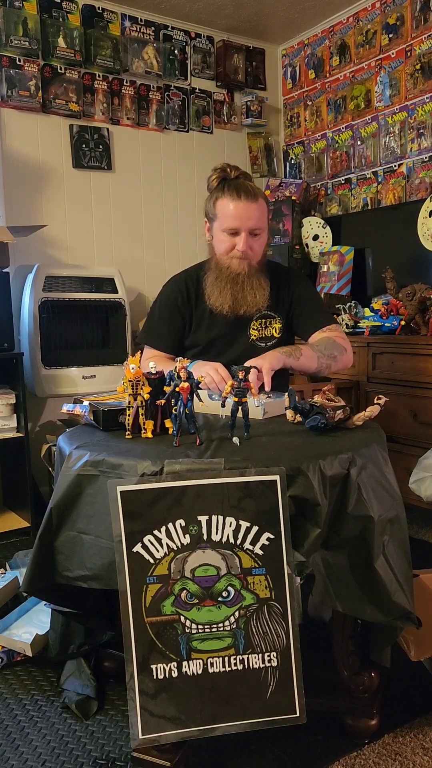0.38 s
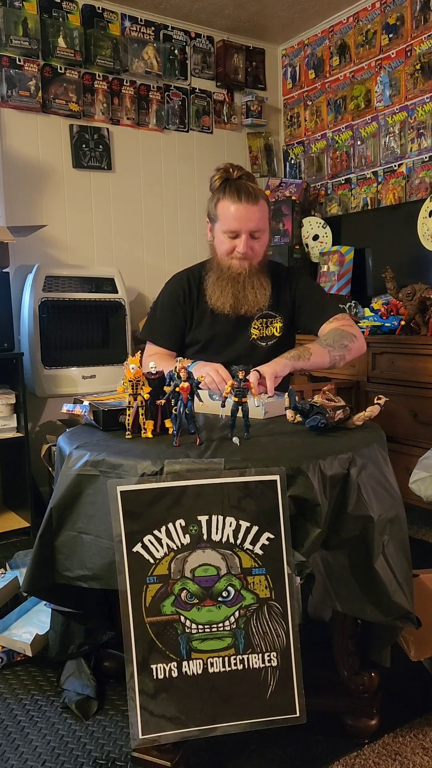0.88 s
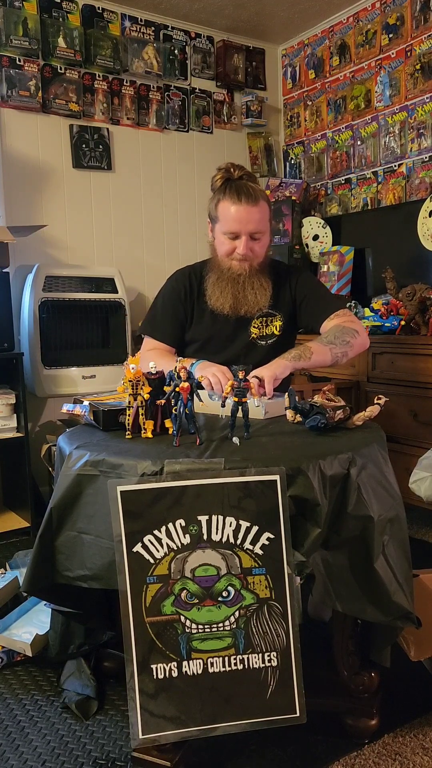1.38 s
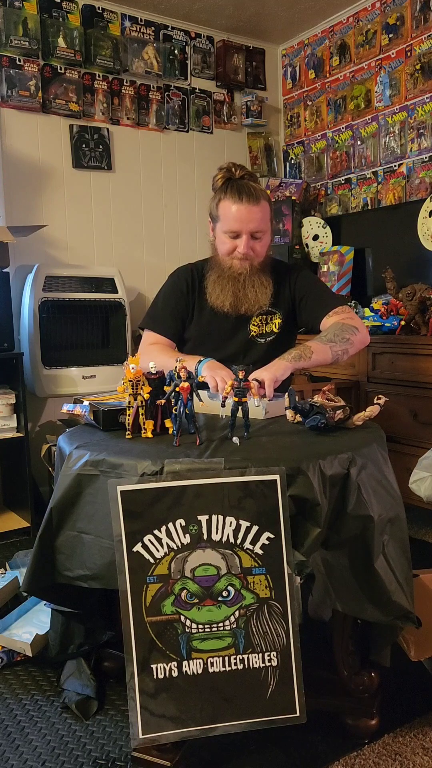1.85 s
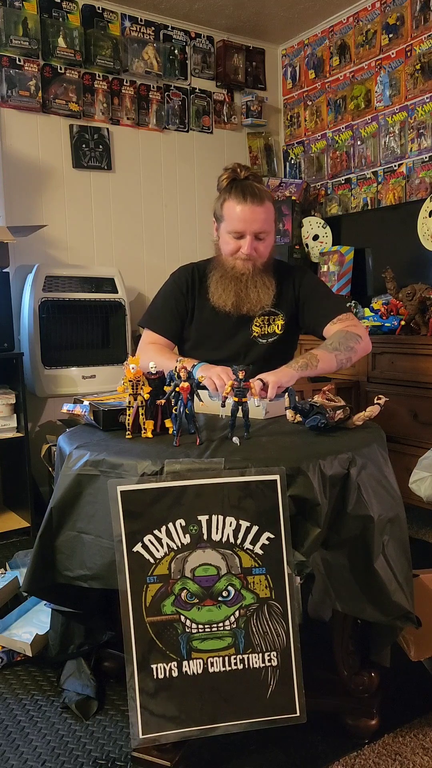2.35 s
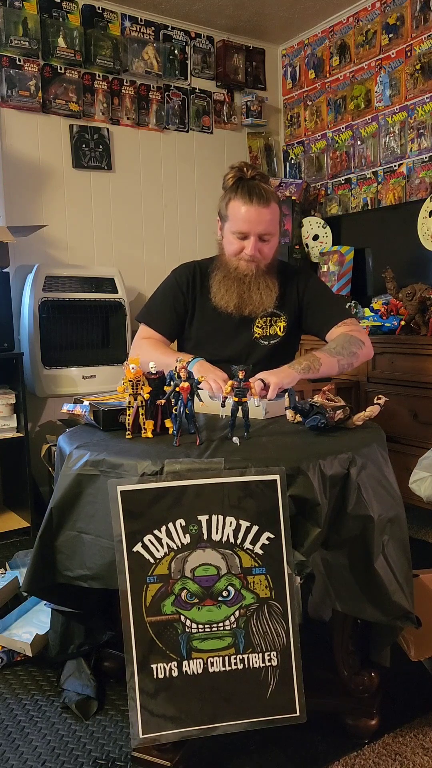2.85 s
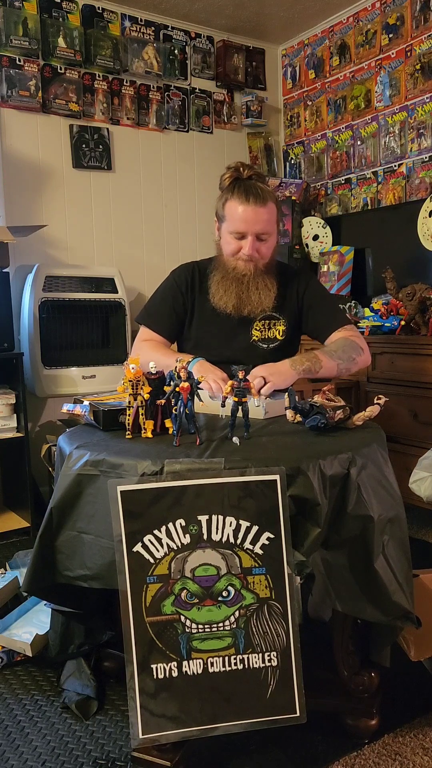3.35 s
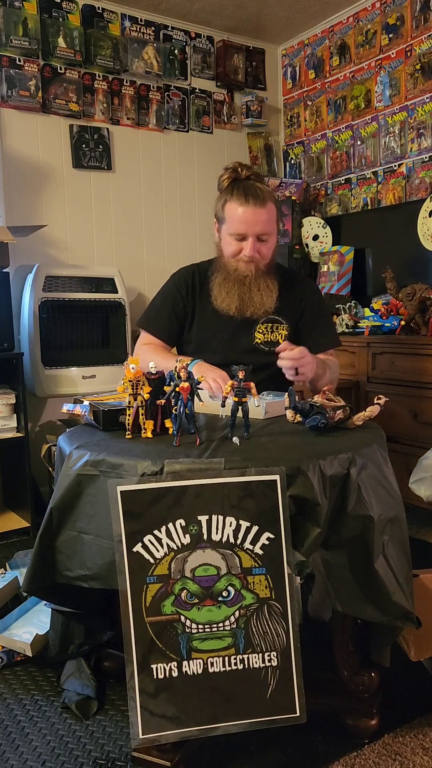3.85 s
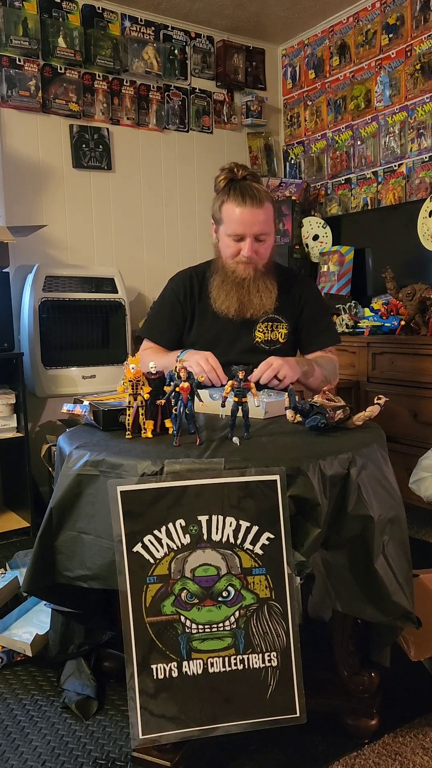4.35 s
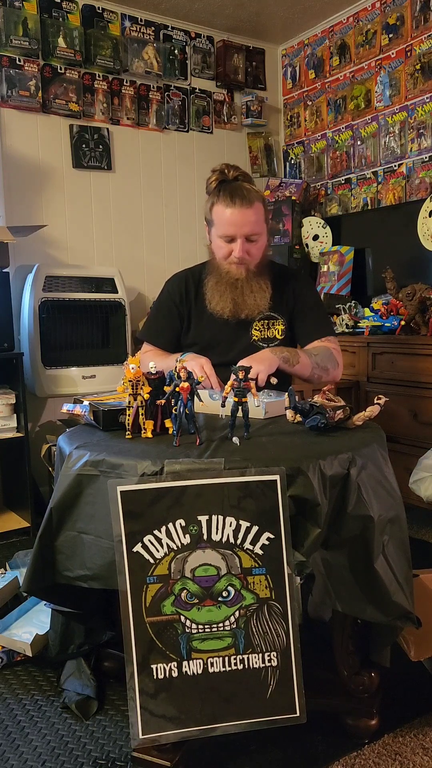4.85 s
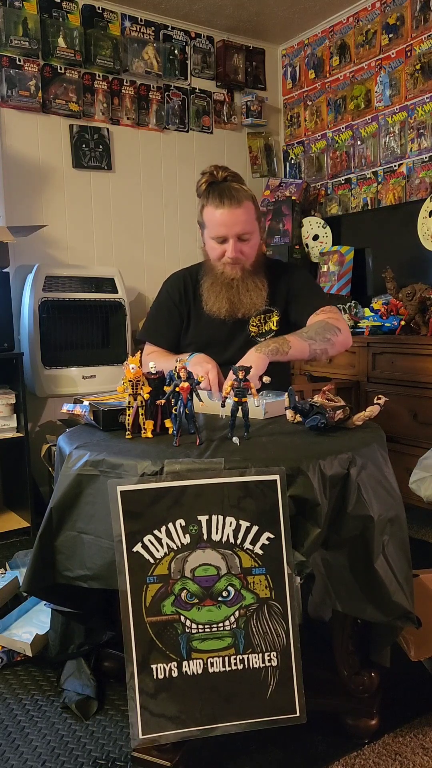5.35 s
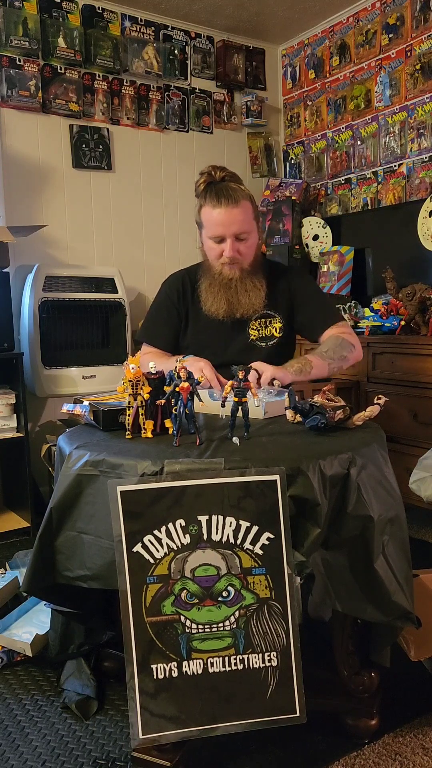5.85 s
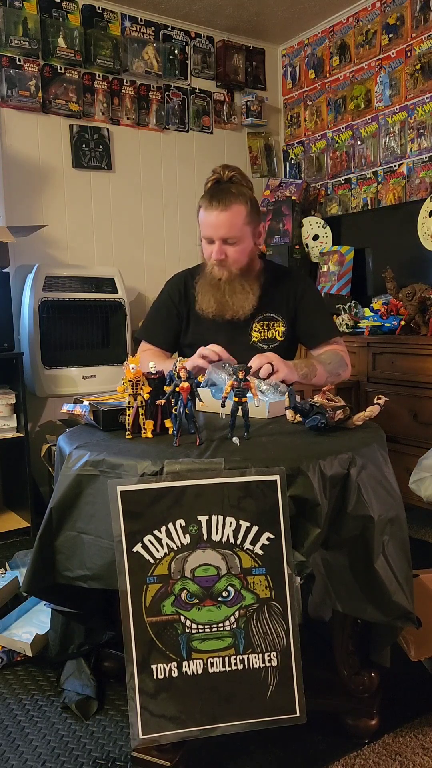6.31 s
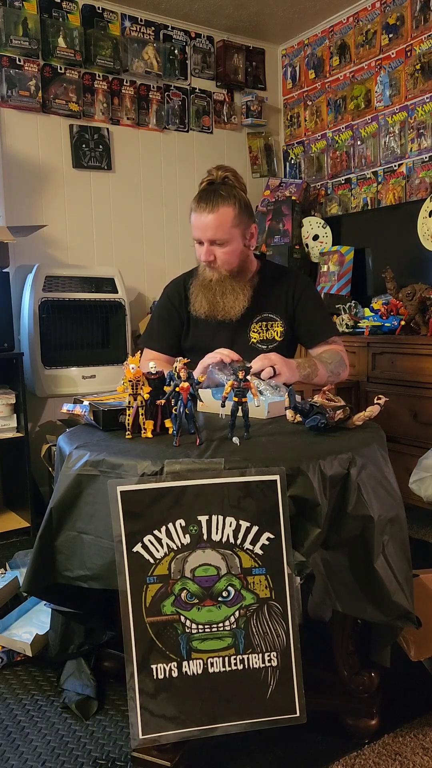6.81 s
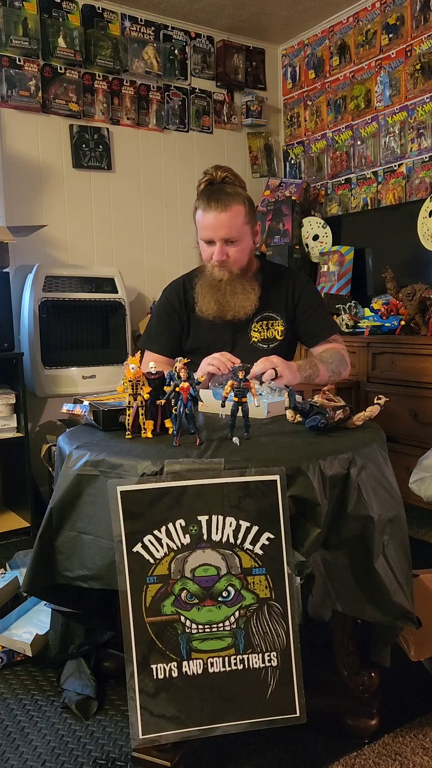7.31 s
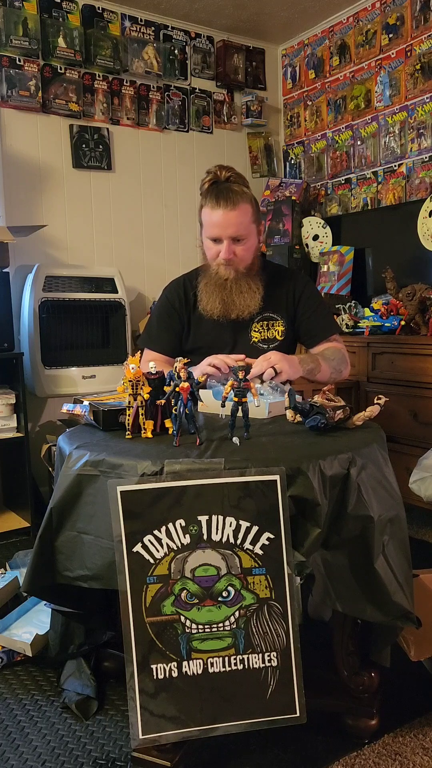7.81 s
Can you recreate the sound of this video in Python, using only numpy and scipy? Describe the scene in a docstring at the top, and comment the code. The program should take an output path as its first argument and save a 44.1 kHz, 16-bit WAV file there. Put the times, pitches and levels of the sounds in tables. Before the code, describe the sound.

A small furnished room with faint air and a low, slightly wavering appliance hum. Hands handle stiff plastic and a cardboard box on a table a few steps from a stereo phone. From 0 to 1 s there are only light ticks and weak rustle. From about 1.2 to 3 s it becomes busy: sharp crease snaps, short pitched plastic pops, fine crackle and hollow box knocks, strong near 1.9 and 2.8 s. It thins around 3.0-3.5 s; firm box and table thumps come at 3.6-3.7 s, then a dense, bright cluster at 4.0-4.25 s. A near-pause follows, broken by one hard snap at 4.8 s. Moderate crackling and bumps run from 5.2 to 6.0 s, then softer, sparse taps until 7.2 s. A final flurry peaks near 7.45 s and dwindles into scattered clicks past 8 s. Reflections are short; the left is crisper, the right duller.

```python
"""Plastic creases snap, fingers knock a cardboard box, and a finer crackle follows the handling over a low hum.
Indoors: hands work a stiff tray and the box on a table, a few steps from a phone with two microphone ports.
Snaps are smeared clicks with a pitched ring; crackle is clumps of tiny clicks; box and table are resonances.
A few echoes and a small furnished room answer; hum is unsteady sines and room air is coloured noise.
The two ports differ in arrival time and brightness."""
import sys
import numpy as np
from scipy import signal
from scipy.fft import rfft, irfft, next_fast_len
from scipy.io import wavfile
from scipy.ndimage import uniform_filter1d, map_coordinates

SR = 44100
rng = np.random.default_rng(int(sys.argv[2]) if len(sys.argv) > 2 else 0)


def magnitude_from_level(level_db):
    """Linear magnitude for a level in decibels (20 dB per decade)."""
    exponent = np.asarray(level_db, float) / 20
    return 10 ** exponent


def dump(signal):
    """Clip the signal to [-1, 1] and save it as 16-bit WAV at the path in sys.argv[1]."""
    limited = np.clip(np.atleast_2d(signal).T, -1, 1)
    pcm = np.round(limited * 32767).astype(np.int16)
    wavfile.write(sys.argv[1], SR, pcm)


N = 361179  # samples


def unit(x):
    """Scaled to rms 1."""
    return x / np.sqrt(np.mean(x ** 2) + 1e-20)


def along(points, hz):
    """(Hz, value) points read on a log frequency axis."""
    f, v = np.transpose(points)
    return np.interp(np.log(hz + 1), np.log(f + 1), v)


def wobble(rate):
    """A smooth random curve with rate knots a second."""
    knots = rng.standard_normal(int(N * rate / SR) + 4)
    return map_coordinates(knots, [np.arange(N) * rate / SR])


def filtered(x, response):
    """The sound x times a complex response of frequency."""
    m = 2 * next_fast_len(x.shape[-1] // 2 + 8192)  # padded, so tails do not wrap round
    spectrum = rfft(x, m) * response(np.fft.rfftfreq(m, 1 / SR))
    return irfft(spectrum, m)[..., :x.shape[-1]]


def causal(points):
    """A minimum-phase colour: its response starts only after the blow."""
    def response(hz):
        cepstrum = irfft(np.log(magnitude_from_level(along(points, hz))))
        cepstrum[1:len(hz) - 1] *= 2  # fold the half before the blow onto the half after
        cepstrum[len(hz):] = 0
        return np.exp(rfft(cepstrum))
    return response


def resonant(modes):
    """A body's response: band-pass resonances summed with alternating sign."""
    def response(hz):
        total = 0
        for k, (centre, width, db) in enumerate(modes):
            damping = 1j * hz * width
            total = total + (-1) ** k * magnitude_from_level(db) * damping / (centre ** 2 - hz ** 2 + damping)
        return total
    return response


def placed(times, shapes):
    """Rows of samples summed at their start times in seconds."""
    at = np.round(times * SR).astype(int)[:, None] + np.arange(shapes.shape[1])
    return np.bincount(at.ravel(), shapes.ravel(), N + SR)[:N]


# room sound at the two ports: pitch_hz, left_right_likeness (1 = identical)
PORT_LIKENESS = [(60, 0.85), (200, 0.99), (500, 0.61), (1200, 0.04), (4000, 0.034)]


def pair(a, b):
    """Two unrelated signals mixed to the left-right likeness of a diffuse field."""
    def mid_side(hz):
        turn = np.arccos(np.clip(along(PORT_LIKENESS, hz), 0, 1)) / 2
        return np.array([np.cos(turn), np.sin(turn)])
    mid, side = filtered(np.array([a, b]), mid_side)
    return np.array([mid + side, mid - side])


# low tones of the appliance and the mains: pitch_hz, level_db (rms before the wobble)
HUM_TONES = [(36.5, -55), (59.5, -80), (119.5, -59.5)]


def hum():
    """A motor and mains hum: sines whose level and phase wander slightly."""
    t = np.arange(N) / SR
    total = np.zeros(N)
    for hz, db in HUM_TONES:
        level = np.sqrt(2) * magnitude_from_level(db + 1.1 * wobble(4.4))
        cycles = hz * t + 0.11 * wobble(1.71)
        total += level * np.sin(2 * np.pi * cycles)
    return total


# colour of the room tone: pitch_hz, level_db (relative, per Hz)
AIR_COLOUR = [(24, -24), (32, -5.5), (55, -6), (85, -5.5), (140, -17), (180, -19.5), (640, -15.5),
              (870, -23), (1900, -24), (2700, -34.5), (7400, -30.5), (8800, -75), (12200, -31.5),
              (15700, -45), (16300, -61)]
AIR_DB = -54  # rms


def room_air():
    """Faint air in the room: diffuse coloured noise."""
    noise = rng.standard_normal((2, N))
    air = unit(filtered(noise, lambda hz: magnitude_from_level(along(AIR_COLOUR, hz))))
    return magnitude_from_level(AIR_DB) * pair(*air)


def grains(count, spread_db, clump_db):
    """Tiny clicks of either sign, a few much larger than the rest, in clumps."""
    when, size, sign = rng.random((count, 3)).T
    heights = np.sign(sign - 0.5) * magnitude_from_level(-spread_db * np.log(size))
    return placed(when * N / SR, heights[:, None]) * magnitude_from_level(clump_db * wobble(25))


# resonances of the cardboard box: pitch_hz, width_hz, level_db
BOX_MODES = [(359, 92, -4.5), (467.6, 33.4, 2), (634.5, 69, 4), (755, 49, 3), (890, 264, -5.5)]
# colour of a plastic crack: pitch_hz, level_db
CRACK_COLOUR = [(300, -21.5), (800, -3.5), (1400, 6.5), (2500, 1), (4000, -3), (8000, -22.5)]
# colour of the finer plastic fizz: pitch_hz, level_db
FIZZ_COLOUR = [(1500, -19.5), (3000, 4.5), (5000, 4), (8000, 6.5), (12000, 5.5), (16000, -8)]
# the tray being bent: start_s, hold_s, plastic_db, fingers_on_box_db (relative)
TRAY_BENDS = [(0.0, 0.037, -54, -61), (0.328, .04, -63, -60), (0.422, 0.17, -59, -66),
              (0.982, 0.16, -62, -77), (1.193, .15, -43, -49), (1.5, 0.32, -42, -46),
              (1.939, 0.065, -39, -43), (2.05, 0.49, -46, -49.5), (2.681, 0.12, -60, -47),
              (2.873, 0.19, -46, -48), (3.046, 0.14, -54, -51), (3.286, .04, -57, -60),
              (3.547, 0.055, -47, -44), (4.13, 0.038, -35.5, -32), (4.217, 0.077, -38, -50),
              (5.167, 0.14, -45, -46.5), (5.439, 0.13, -56.5, -44), (5.655, 0.29, -50, -46.5),
              (6.005, 0.11, -52, -54), (6.453, 0.044, -54, -51), (6.556, 0.12, -55, -50),
              (6.853, 0.41, -72, -52.5), (7.334, 0.089, -39, -40.5), (7.676, .03, -44, -45.5),
              (7.91, 0.37, -64, -48)]
RISE_DB_PER_S, FALL_DB_PER_S = 200, 194  # pressure building up and letting go


def crackle():
    """Small creases give way while the plastic is bent; fingers rub and tap the resonant box."""
    start, hold, plastic_db, fingers_db = np.transpose(TRAY_BENDS)[:, :, None]
    t = np.arange(N) / SR
    before = np.maximum(start - t, 0)
    after = np.maximum(t - start - hold, 0)
    pressure = magnitude_from_level(-RISE_DB_PER_S * before - FALL_DB_PER_S * after)
    plastic = grains(count=2000, spread_db=5.0, clump_db=0.5)
    plastic = filtered(plastic, causal(FIZZ_COLOUR)) + magnitude_from_level(2.0) * filtered(plastic, causal(CRACK_COLOUR))
    fingers = grains(count=1600, spread_db=5.5, clump_db=3.0)
    fingers = filtered(fingers, resonant(BOX_MODES)) + magnitude_from_level(-16.0) * filtered(fingers, causal(CRACK_COLOUR))
    # where bends overlap, the strongest sets the level
    plastic_level = (magnitude_from_level(plastic_db) * pressure).max(axis=0)
    fingers_level = (magnitude_from_level(fingers_db) * pressure).max(axis=0)
    return plastic_level * unit(plastic) + fingers_level * unit(fingers)


# direct path, partly hidden by hands and objects: pitch_hz, level_db
DIRECT_SHADE = [(400, 0.5), (1500, 1.5), (4000, -1), (10000, -4)]
# nearest hard surfaces: left_port_s, level_at_1khz_db, level_at_8khz_db, right_port_later_s (negative: earlier)
NEAR_ECHOES = [(.0057, -3.5, -4.5, -0.0036), (.011, -17, -32, -0.016), (0.0164, -13, -25, .0001),
               (.024, -16, -10, -0.0049)]
LEAD_S = 16 / 44100  # the left port is nearer


def direct_and_echoes(x):
    """Direct sound meets the left port first; near surfaces add coloured copies, mostly delayed.

    One copy reaches the right port ahead of the direct sound."""
    def late(hz, left_s, right_s):
        return np.exp(-2j * np.pi * hz * [[left_s], [right_s]])

    def early(hz):
        total = causal(DIRECT_SHADE)(hz) * late(hz, 0, LEAD_S)
        for left_s, low_db, high_db, lag in NEAR_ECHOES:
            colour = magnitude_from_level(along([(1000, low_db), (8000, high_db)], hz))
            total = total + colour * late(hz, left_s, left_s + lag)
        return total
    return filtered(x, early)


# decay of the furnished room: pitch_hz, t60_s
ROOM_DECAY = [(200, 0.28), (600, 0.22), (1500, 0.29), (4000, 0.36), (12000, 0.25)]


def room(x):
    """The hands move, so every fifth of a second meets a new decaying pattern of reflections."""
    step = SR // 5
    out = np.zeros((2, N + 2 * SR))
    for start in range(0, N, step):
        hz, t, z = signal.stft(rng.standard_normal((2, SR // 3)), SR, nperseg=256)
        decay = magnitude_from_level(-60 * t / along(ROOM_DECAY, hz)[:, None])
        tail = signal.istft(z * decay, SR, nperseg=256)[1]
        # table clutter scatters first, walls later
        tail *= np.clip(0.55 + np.arange(tail.shape[1]) / SR / 0.021, 0, 1)
        tail /= np.linalg.norm(tail[0])
        answer = signal.fftconvolve(x[None, start:start + step], tail, axes=1)
        out[:, start:start + answer.shape[1]] += answer
    return pair(*out[:, :N])


def clicks(count, smear_s):
    """Even-coloured clicks whose frequencies leave the bending sheet at slightly different moments."""
    hz = np.fft.rfftfreq(512, 1 / SR)
    delay = smear_s * uniform_filter1d(rng.standard_normal((count, len(hz))), size=12, axis=1) ** 2
    return irfft(np.exp(-2j * np.pi * hz[1] * np.cumsum(delay, axis=1)))  # phase sums the delays


# creases snapping: start_s, crack_db (relative), box_knock_db and fizz_db (over the crack), panel_pitch_hz
CREASE_SNAPS = [(0.155, -38.5, -4.5, -14, 902), (0.2276, -35, -18, -18, 1320), (0.279, -43, -5, -1, 1620),
                (0.3295, -30.5, -37, -40, 2230), (0.4052, -32.5, -9.5, 0.5, 1330),
                (0.5107, -34, -24, -7, 1430), (0.5232, -27.5, -2.5, -14, 940),
                (0.5534, -27, -24, -20, 1050), (0.6726, -44, -17, 0, 3340), (0.702, -39, -9, -1.5, 1570),
                (0.85, -47.5, -8, 8, 3900), (1.0006, -29, -9.5, -8, 3390), (1.0713, -31, -4.5, -15, 940),
                (1.1183, -22.5, -27, -21, 3380), (1.164, -29.5, -8, -3, 950), (1.2139, -38, -27, 7, 3340),
                (1.261, -28, -19, -22, 3210), (1.2747, -19.5, -18, -10, 1940),
                (1.3439, -12.5, -15, -14, 885), (1.3597, -15, -15, -9, 1340), (1.4336, -29, -10, 0, 3800),
                (1.4473, -13.5, -11.5, -5.5, 1320), (1.5524, -19.5, -11, -31, 1680),
                (1.5645, -21, -12.5, -22, 1640), (1.586, -22, -38, -10, 1610),
                (1.6113, -14.5, -20.5, -9, 1290), (1.6384, -18.5, -12.5, -8.5, 2170),
                (1.7187, -19, -17, -23, 1010), (1.733, -18, -5.5, -7.5, 1580),
                (1.7635, -10.5, -15, -19, 1570), (1.7869, -16, -21, -6, 980),
                (1.8992, -12.5, -28, -13, 1300), (1.932, -5.5, -14.5, -9.5, 1430),
                (2.0406, -14.5, -16, -35, 1350), (2.1684, -38, -18, 0, 2070),
                (2.2812, -14.5, -18.5, -19.5, 1320), (2.3224, -24.5, -2, -2.5, 1590),
                (2.3537, -22, -10, -16, 1230), (2.4059, -15.5, -23, -10.5, 3100),
                (2.4554, -14.5, -17.5, -25, 1450), (2.603, -28.5, -21.5, -33, 1400),
                (2.6858, -18.5, -26, -13, 1440), (2.741, -23.5, -23, -5, 1220),
                (2.7575, -14.5, -21, -12.5, 3380), (2.7837, -17.5, -27, -7.5, 1580),
                (2.829, -4, -21, -20.5, 850), (2.9762, -18.5, -18.5, -9, 1530),
                (3.0912, -38.5, -17, 1, 1800), (3.1755, -33, -23, -48, 1190),
                (3.2656, -29.5, -33, -10, 2130), (3.2829, -22.5, -22, -5, 3560),
                (3.472, -43, -4.5, -2, 3800), (3.492, -37.5, -22, -8, 1250), (3.5251, -25.5, -17, -7, 3270),
                (3.567, -14.5, -20.5, -9.5, 2800), (3.6323, -10.5, -6.5, -14.5, 1050),
                (3.701, -14.5, -3, -11, 1340), (3.899, -35, -27.5, -45, 1340),
                (3.9642, -27.5, -27, -23, 2330), (3.9969, -23, -8, -12, 1590),
                (4.0135, -15.5, -16, -12.5, 3500), (4.031, -15.5, -10.5, -13, 1640),
                (4.054, -17.5, -26, -9, 1500), (4.1086, -17.5, -31, -8, 960), (4.131, -12, -12, -8.5, 2150),
                (4.1525, -10, -13.5, -10, 2120), (4.1913, -3, -35, -24, 2260),
                (4.2375, -4.5, -24.5, -15.5, 864), (4.416, -28.5, -14, -9.5, 1980),
                (4.7048, -47, -1, -1, 960), (4.7296, -41, -14, -26, 1470), (4.799, -39, -9, 3, 1060),
                (4.8056, -4, -12.5, -17.5, 960), (5.016, -30, -8.5, -23, 1270),
                (5.0809, -23, -12, -24, 1480), (5.134, -32.5, -17, -4.5, 1500),
                (5.1969, -18, -27, -33, 1920), (5.2568, -14.5, -14, -6.5, 1660),
                (5.421, -27, -27, -21, 1450), (5.4323, -21, -8, -14, 1440), (5.47, -16.5, -5, -15, 890),
                (5.4986, -15.5, -23, -13, 1470), (5.535, -16, -11, -5, 1180),
                (5.6546, -29.5, -7, -7.5, 2180), (5.7104, -32.5, -11, -7, 1620),
                (5.7883, -21, -9.5, -9.5, 880), (5.8082, -17.5, -27, -16, 1800),
                (5.9216, -21.5, -12, -12, 1680), (6.0193, -15.5, -26, -12.5, 1640),
                (6.032, -28.5, -3, -31, 1580), (6.1874, -38, -3, -2.5, 1560), (6.2027, -22.5, -6, -22, 960),
                (6.2923, -41.5, 4.5, -14, 1240), (6.414, -33, -12.5, -12, 1480),
                (6.4831, -33, 2, -7.5, 1650), (6.5887, -30, -22, -7, 958), (6.6574, -31, -3.5, -7.5, 1330),
                (6.7866, -26, -7.5, -26, 1060), (6.8633, -38, -3, -38, 1323),
                (6.9752, -21.5, -8.5, -13, 1760), (7.0559, -28.5, -9, -14, 2020),
                (7.159, -29.5, -3, -5.5, 1610), (7.2784, -18, -15.5, -11, 2130),
                (7.318, -17.5, -18, -12, 2660), (7.3385, -14, -14.5, -27, 1170),
                (7.3898, -23.5, -10.5, -11.5, 3140), (7.4128, -23.5, -18, -11, 900),
                (7.45, -25, -24, -9, 910), (7.4655, -7.5, -13, -12, 820), (7.609, -21, -37, -5, 880),
                (7.649, -26.5, -24.5, -3, 1550), (7.735, -26, -17, -16.5, 1040),
                (7.875, -33.5, -1, -34, 1730), (7.9078, -23.5, -23, -9, 2400),
                (7.936, -28, -22, -1.5, 1320), (8.0166, -20.5, -13, -6.5, 3550),
                (8.029, -24.5, -19, -7.5, 1170), (8.134, -14.5, -8.5, -21.5, 940)]
# the box bumping the table top: start_s, level_db (relative)
TABLE_BUMPS = [(0.523, -16), (1.072, -10), (1.36, -7), (1.447, 0.5), (1.611, -0.5), (1.734, 1),
               (1.763, 2.5), (1.932, 10), (2.041, -11), (3.632, 9), (3.701, 11), (4.032, -2), (4.807, -19),
               (5.017, -7), (5.257, 6), (5.433, 0), (5.47, 8), (5.499, -8), (5.71, -5.5), (5.809, 1),
               (6.204, -9), (6.483, -12), (6.657, -3.5), (7.163, -6), (7.39, -6), (8.134, -4)]
# resonances of the table top: pitch_hz, width_hz, level_db
TABLE_MODES = [(164, 73, -3), (281, 47.3, 4.5)]
RING_CYCLES = 11.7  # the panel's ring falls at 60 dB in this many cycles
THROUGH_BOX_DB = -19  # share of every box knock that reaches the table top


def snaps():
    """A buckling crease: a sharp click that rings the panel at its pitch, fizzes, and knocks box and table."""
    start, crack_db, knock_db, fizz_db, hz = np.transpose(CREASE_SNAPS)[:, :, None]
    bump_start, bump_db = np.transpose(TABLE_BUMPS)
    t = np.arange(512) / SR

    def blow(db, shape):
        return placed(start[:, 0], magnitude_from_level(db) * shape)
    ring = blow(crack_db - 7.5 - 60 * t * hz / RING_CYCLES, np.sin(2 * np.pi * hz * t))
    click = blow(crack_db + 13.5, clicks(len(start), smear_s=0.00497))
    crack = filtered(click + ring, causal(CRACK_COLOUR))
    fizz = blow(crack_db + fizz_db + 18.0, clicks(len(start), smear_s=0.012))
    fizz = filtered(fizz, causal(FIZZ_COLOUR))
    knocks = blow(crack_db + knock_db + 35.5, 0.92)
    thumps = magnitude_from_level(THROUGH_BOX_DB) * knocks + placed(bump_start, magnitude_from_level(bump_db)[:, None])
    return crack + fizz + filtered(knocks, resonant(BOX_MODES)) + filtered(thumps, resonant(TABLE_MODES))


# colour the ports give the handling sounds: pitch_hz, level_db
PORT_COLOUR = [(2000, 1.5), (6000, -1), (7400, -0.5), (8700, -16.5), (10200, -9.5), (12200, 5),
               (14000, 0.5), (15700, 7), (16300, -41)]


def scene():
    """Hands heard directly, by echoes and through the room, over the hum and air."""
    hands = crackle() + snaps()
    handled = magnitude_from_level(-0.4) * direct_and_echoes(hands) + magnitude_from_level(2.5) * room(hands)
    return filtered(handled, causal(PORT_COLOUR)) + hum() + room_air()


# brightness of the two ports: pitch_hz, left_over_right_db
PORT_LEAN = [(60, 0), (120, 0.5), (240, -2), (480, -0.5), (950, -2.5), (1890, -1.5), (3770, 8), (7520, 16),
             (15000, 3.5)]


def two_ports(sound):
    """The right port faces away and loses treble; the level difference is split between the ports."""
    return filtered(sound, lambda hz: magnitude_from_level(along(PORT_LEAN, hz) * [[0.5], [-0.5]]))


def roll_off(x):
    """The treble ends steeply here."""
    return signal.sosfilt(signal.butter(12, 16670, fs=SR, output="sos"), x)


def record(dry):
    """The phone's two ports pick up the scene."""
    mix = two_ports(dry)
    return roll_off(mix)


dry = scene()
out = record(dry)
dump(out)
```